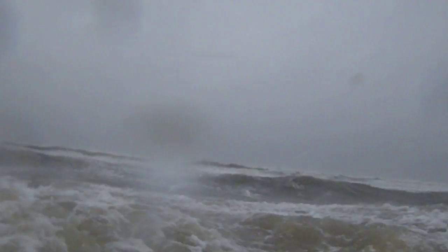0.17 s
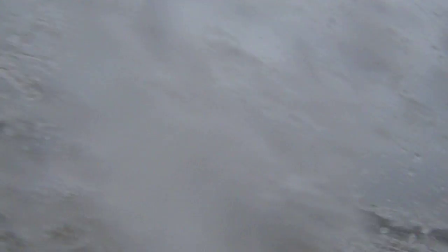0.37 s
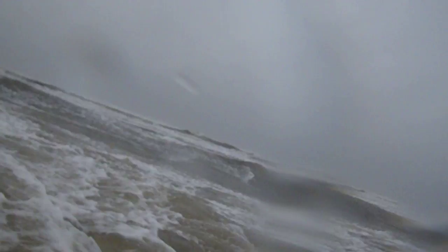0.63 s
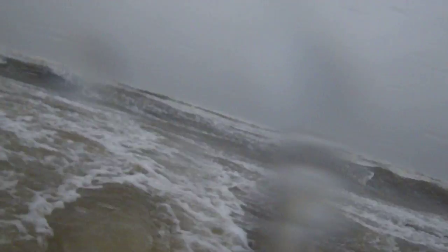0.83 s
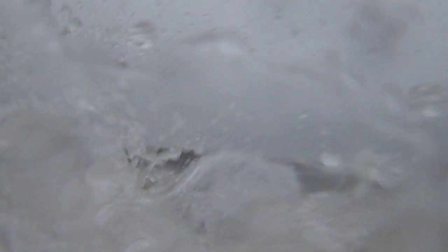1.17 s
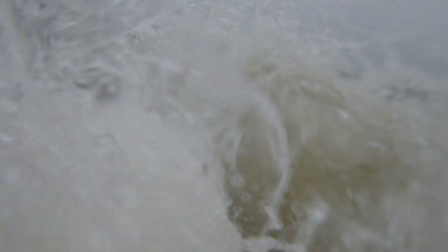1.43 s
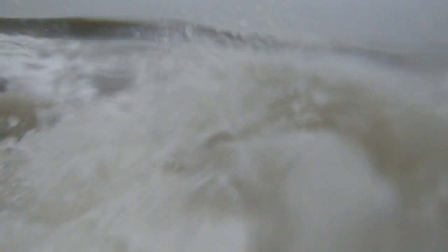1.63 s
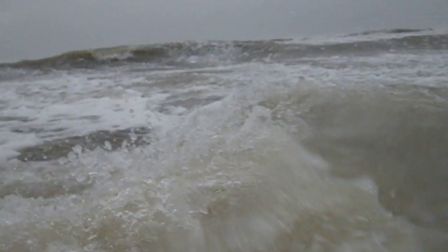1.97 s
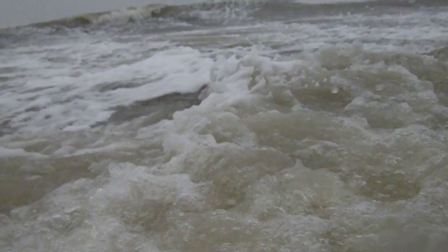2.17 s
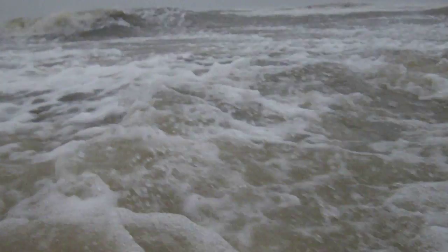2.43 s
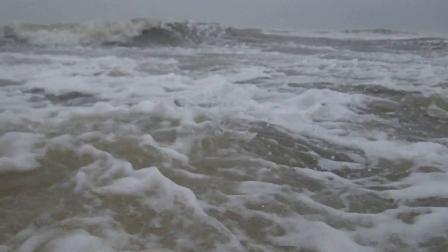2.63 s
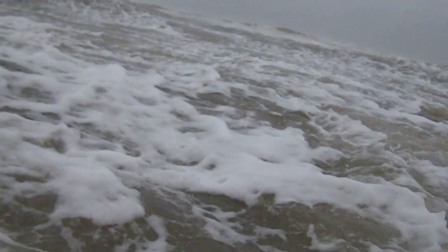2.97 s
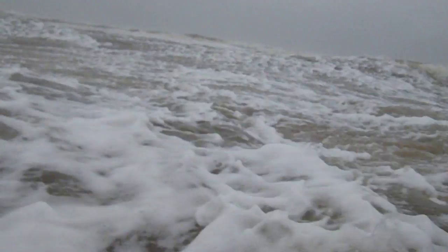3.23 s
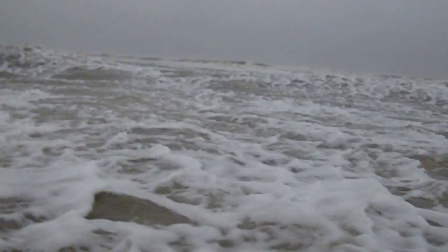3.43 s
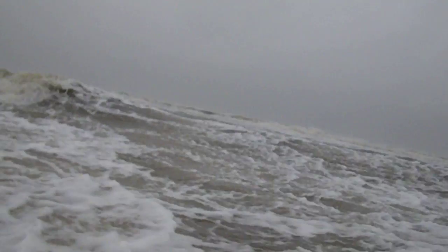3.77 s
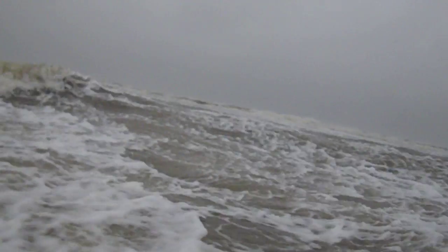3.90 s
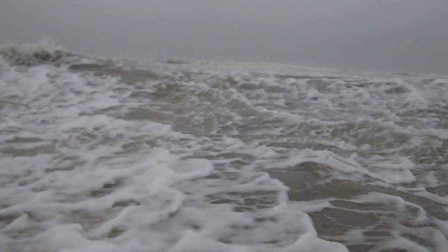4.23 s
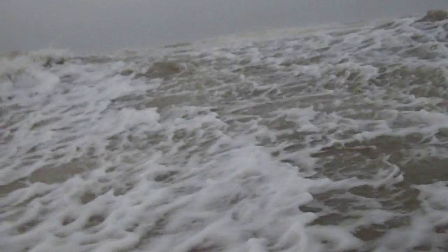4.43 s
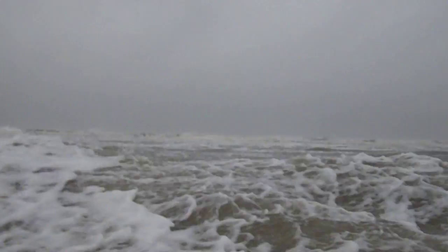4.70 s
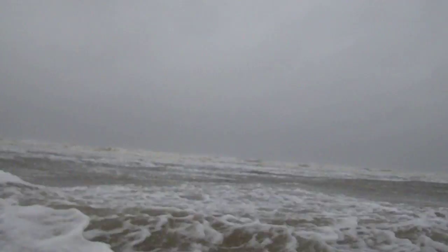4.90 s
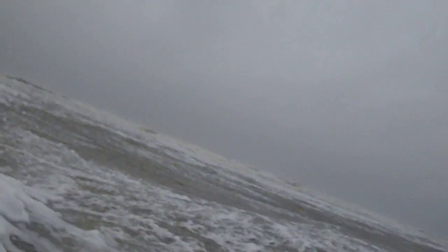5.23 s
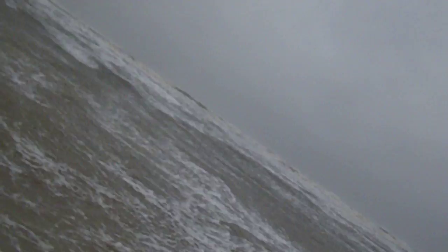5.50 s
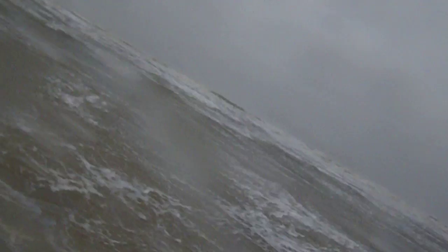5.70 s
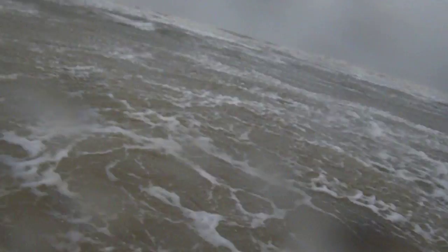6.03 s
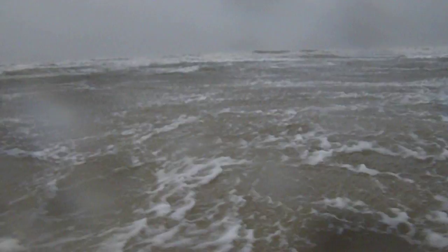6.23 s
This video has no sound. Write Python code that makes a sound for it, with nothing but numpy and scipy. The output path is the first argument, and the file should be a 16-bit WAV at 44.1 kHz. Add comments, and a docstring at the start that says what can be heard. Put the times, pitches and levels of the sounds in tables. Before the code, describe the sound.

Muffled, lumpy wind roar over churning breakers, with bursts of hard drops spattering the microphone cover and brief abrupt dips in the background.

```python
"""Gale-force wind buffets a small sealed camera on an open beach: eddies make lumpy low-pressure noise.
Surf and spray are shaped noise under the same turbulence; a brief whistle is noise in a narrow moving band.
Drops striking the microphone cover are heavily damped ticks and thumps, the big ones with a noise splat.
Now and then, mostly just after a heavy drop, the background drops abruptly and recovers in about 0.1 s.
A narrow-band microphone channel limits, rounds and clips the sum."""
import sys
import numpy as np
from scipy import signal
from scipy.fft import rfft, irfft
from scipy.io import wavfile
from scipy.ndimage import uniform_filter1d, minimum_filter1d

SR = 44100
rng = np.random.default_rng(int(sys.argv[2]) if len(sys.argv) > 2 else 0)


def materialize(psi):
    """Save the field psi as 16-bit PCM at rate SR to the path in sys.argv[1].

    A 1-D psi becomes a single channel; in a 2-D psi each row is a channel.
    """
    bounded = np.clip(np.atleast_2d(psi).T, -1, 1)
    quanta = np.round(bounded * 32767).astype(np.int16)
    wavfile.write(sys.argv[1], SR, quanta)


N = 280917
TIME = np.arange(N) / SR
RING_TIME = np.arange(900) / SR  # time axis of one drop's sound

# All levels are relative: each source adds its own trim, and each spectrum is scaled to an rms of one.
# strength of the wind on the microphone: (time [s], level [dB])
WIND_STRENGTH = [(0, -25.0), (0.3, -25), (0.7, -28.5), (1.3, -28.0), (2.0, -26.5), (2.55, -22.5),
                 (3.8, -24), (4.85, -23), (5.1, -25.5), (5.75, -23), (6.37, -26.0)]
# gusts that stand out of the gale: (time of peak [s], length [s], boost [dB])
GUST_ARCHES = [(.5, .07, 3), (1.33, .08, 3.5), (1.51, 0.13, 5), (1.7, 0.035, 5), (1.92, 0.079, 5),
               (2.22, .05, 2.5), (2.41, .07, 2.5), (3.17, .12, 3), (3.48, 0.058, 3.5), (3.6, 0.076, 3.5),
               (3.82, .07, 3), (4.075, .04, 6), (4.45, .06, 1.5), (4.56, .08, 3.5), (4.88, 0.025, 5.5)]
# spectrum of the wind pressure: (frequency [Hz], density [dB per Hz])
WIND_SPECTRUM = [(20, -46), (50, -22.5), (100, -10.5), (170, -1.5), (270, 1.5), (400, -2.5), (600, -12),
                 (1200, -41.5), (3000, -57)]
# roar of the breakers as they swell and ebb: (time [s], level [dB])
SURF_STRENGTH = [(0, -21.5), (0.1, -22.5), (0.5, -25.5), (0.62, -29.5), (0.82, -22.5), (1.05, -29),
                 (2.2, -26.5), (2.45, -24.0), (2.92, -23), (3.38, -30.5), (3.65, -22.5), (4.15, -30),
                 (4.35, -30), (4.95, -20.5), (5.3, -33.5), (5.52, -26), (5.76, -21.5), (6.0, -33),
                 (6.28, -21), (6.37, -23.5)]
# spectrum of the roar: (frequency [Hz], density [dB per Hz])
SURF_SPECTRUM = [(100, -35), (300, -15.5), (480, 0.5), (700, 0), (850, -6), (1150, -7), (1500, -17),
                 (3000, -48.5)]
# hiss of foam and flying spray: (time [s], level [dB])
FOAM_STRENGTH = [(0, -33.5), (0.1, -28.5), (0.28, -29), (0.6, -30.5), (0.82, -24), (1.05, -31.5),
                 (1.25, -29), (1.6, -32.5), (2.05, -30.0), (2.5, -34.5), (3.0, -33.0), (3.4, -35),
                 (3.9, -35), (4.35, -35), (4.62, -39), (5.0, -31.5), (5.5, -32), (5.8, -26.5), (6.25, -33),
                 (6.37, -37)]
# sheets of spray thrown at the housing: (time of peak [s], length [s], boost [dB])
SPRAY_SHEETS = [(.82, 0.12, 4.5), (1.23, .11, 4), (1.49, 0.066, 6), (2.05, .07, 4), (2.86, .06, 3.5),
                (3.89, .1, 7.5), (4.28, .05, 5.5), (5.5, .06, 9.5), (5.56, 0.029, 9), (5.79, 0.082, 6.5),
                (6.05, 0.15, 13)]
# spectrum of the foam hiss: (frequency [Hz], density [dB per Hz])
FOAM_SPECTRUM = [(300, -24), (900, 2.5), (1400, 3.5), (1900, 7), (2450, 7), (2900, -2.5), (3600, -6),
                 (4200, -20)]
# spectrum of droplets bursting close by, brighter than the foam: (frequency [Hz], density [dB per Hz])
DROPLET_SPECTRUM = [(300, -25), (900, -2.5), (1300, 0.5), (1900, -2), (2450, 7), (2900, -4), (3600, -0.5),
                    (4200, -16.5)]
# rushing tone as the gust catches an edge of the housing: (time [s], frequency [Hz], level [dB])
WHISTLE_TRACK = [(0, 1520, -43), (.07, 1560, -23.5), (.15, 1606, -31.5), (.21, 1602, -22.5),
                 (.28, 1520, -28), (.34, 1620, -66)]
# big drops on the microphone cover:
# (time [s], force [dB], tick pitch [Hz], thump level relative to the tick [dB], thump pitch [Hz])
BIG_DROPS = [(0.2418, -9, 1430, 7, 350), (.3082, -2, 2140, 1, 575), (0.3141, -1.5, 2040, -5, 567),
             (.333, -7.5, 2050, 9.5, 400), (.3571, -4.5, 1740, 6, 513), (0.4118, -8.5, 2340, -4, 280),
             (0.4897, -13, 1590, 12, 493), (.509, -4.5, 2200, 6, 630), (0.5679, -10, 1770, 6, 500),
             (.6389, -2.5, 1770, 1, 866), (0.7265, -9, 2000, -17, 510), (0.7477, 1.5, 1750, -0.5, 513),
             (.781, -4, 1790, 5, 1120), (0.8048, 1.5, 2120, 2, 580), (0.8179, 2, 2100, 2, 490),
             (0.8352, 5, 1490, 3.5, 463), (0.8802, 2, 1640, 7, 497), (0.911, 1, 1920, 0, 600),
             (0.9162, 5, 2150, 7, 370), (1.022, -8.5, 2690, 6.5, 403), (1.0622, -9.5, 2520, 6, 337),
             (1.1023, 4, 1955, -2.5, 405), (1.2695, -8.5, 2970, -22, 617), (1.3715, -7.5, 2570, -9, 800),
             (1.5504, -5, 1740, 11.5, 416), (1.624, -9.5, 2340, 7.5, 298), (1.6331, -10.5, 2420, -8, 404),
             (1.705, -7.5, 2306, 6, 354), (1.7541, -7.5, 1910, -0.5, 695), (1.7635, -1.5, 1930, 1.5, 725),
             (1.878, -5.5, 2070, -1.5, 920), (1.9783, -8.5, 2430, -20, 590), (2.1528, -10, 1980, 6, 380),
             (2.2345, -11, 1860, 5, 440), (2.434, -7.5, 2020, -1, 740), (2.8474, -10, 1890, -17, 590),
             (3.3058, -1.5, 2000, -18, 675), (4.1861, -19, 1700, 16.5, 450),
             (4.3321, -12.5, 3050, -15, 414), (4.384, -11.5, 1480, 9.5, 300), (4.42, -12.5, 2460, 8, 310),
             (5.0914, -5, 2260, -9.5, 920), (5.1634, -8, 2400, -13, 696), (5.1684, -1, 2220, -30, 746),
             (5.2031, -5, 2170, -6, 400), (5.2258, -0.5, 1330, 3, 950), (5.3592, -1, 1850, -2, 504),
             (5.4179, -2, 2380, -36, 820), (5.4569, 4, 2300, -10.5, 790), (5.5046, -1, 2430, -16, 500),
             (5.5237, -3.5, 1580, -24, 960), (5.5426, -2.5, 2410, -30, 460), (5.5623, -5, 1710, 3, 1150),
             (5.5741, 10.5, 2220, -8, 646), (5.672, -8.5, 2110, -8, 424), (5.6936, -9, 1900, 6.5, 694),
             (5.705, -4.5, 2140, -20, 710), (5.7158, 0, 1500, 6.5, 900), (5.7338, 1.5, 2200, 0, 300),
             (5.786, -3.5, 2020, -17, 600), (5.8015, -7, 1800, 8.5, 493), (5.8438, -7.5, 2020, -0.5, 695),
             (5.875, -12.5, 1780, 3, 406), (5.992, -0.5, 1950, 4, 434), (6.046, -4, 2140, -2, 714),
             (6.059, 0, 2030, -10, 610), (6.0724, 2.5, 1760, -16, 880), (6.0804, -1.5, 1940, 1.5, 670),
             (6.1996, -3.5, 2100, -34, 520), (6.243, -9.5, 1840, -16, 590), (6.2857, -8.5, 2020, -18, 610),
             (6.3437, -11, 1940, -10, 533)]
# spectrum of a big drop's burst: (frequency [Hz], density [dB per Hz])
SPLAT_SPECTRUM = [(150, -23.5), (400, 1.5), (1100, 13), (2000, -6), (3000, 8.5), (4200, -14)]
# abrupt dips of the background, mostly just after a heavy drop:
# (time of onset [s], time to recover [s], depth [dB])
LEVEL_DIPS = [(.364, 0.057, 6.5), (0.645, 0.11, 11), (.92, 0.089, 3.5), (1.108, 0.092, 10),
              (1.376, 0.034, 11.5), (1.556, 0.081, 4), (1.767, 0.12, 12.5), (3.217, 0.041, 11.5),
              (3.41, .05, 7.5), (5.578, 0.092, 3), (5.883, 0.12, 21.5), (6.092, 0.12, 14)]


def gain_of(db):
    """Decibels: the amplitude ratio is ten to the power of level over twenty."""
    return 10 ** (np.asarray(db) / 20)


def evened(x):
    """Normalization: the root mean square becomes one."""
    return x / np.sqrt(np.mean(x ** 2) + 1e-20)


def follow(rows):
    """Linear interpolation: the columns of a table become curves in time."""
    s, *columns = np.transpose(rows)
    return [np.interp(TIME, s, column) for column in columns]


def humps(rows):
    """Superposition of half-cosine arches: each row swells and falls away once; the sum is in dB."""
    total_db = np.zeros(N)
    for s, length, db in rows:
        phase = np.clip((TIME - s) / length, -.5, .5)
        total_db += db * np.cos(np.pi * phase)
    return total_db


def coloured(x, spectrum):
    """Spectral shaping: a table of gains over log frequency weights x, at an rms of one."""
    hz, db = np.transpose(spectrum)
    bins_hz = np.fft.rfftfreq(N, 1 / SR)
    gain = gain_of(np.interp(np.log(bins_hz + 1), np.log(hz), db))
    return evened(irfft(rfft(x) * gain, N))


def flutter(slow_hz, fast_hz):
    """Band-limited random modulation: noise kept between two rates, at an rms of one."""
    hz = np.fft.rfftfreq(N, 1 / SR)
    slow_cut = hz ** 2 / (hz ** 2 + slow_hz ** 2)
    band = slow_cut / (1 + (hz / fast_hz) ** 4)
    return evened(irfft(rfft(rng.standard_normal(N)) * band, N))


def steadied(x, size=4000):
    """Division by short-term rms: slow drift in strength goes, quick flutter stays; size in samples."""
    power = uniform_filter1d(uniform_filter1d(x ** 2, size), size // 2)
    return x / np.sqrt(abs(power) + 1e-12)


def low_pass(x, hz, size):
    """Linear-phase filtering: a symmetric kernel of size samples removes treble without delay."""
    return signal.oaconvolve(x, signal.firwin(size, hz, window="blackman", fs=SR), "same")


def high_pass(x, hz):
    """Second-order filtering: bass falls gently below the corner frequency."""
    return signal.sosfilt(signal.butter(2, hz, "highpass", fs=SR, output="sos"), x)


def tilted(x, pivot_hz, tilt_db):
    """Spectral tilt: what lies above the pivot rises as what lies below it falls."""
    low = low_pass(x, pivot_hz, size=201)
    high = x - low
    return low * gain_of(-tilt_db) + high * gain_of(tilt_db)


def wind(level_db, eddies, eddy_db=2.5):
    """Turbulent pressure: eddies rolling over the microphone modulate low-frequency noise."""
    pressure = rng.standard_normal(N) * gain_of(eddy_db * eddies)
    return gain_of(level_db + 1.5) * steadied(coloured(pressure, WIND_SPECTRUM), size=3000)


def surf(level_db, eddies, eddy_db=3.5):
    """Broadband radiation of white water: noise of fixed colour, torn by the same eddies."""
    roar = rng.standard_normal(N) * gain_of(eddy_db * eddies)
    return gain_of(level_db - 0.76) * steadied(coloured(roar, SURF_SPECTRUM))


def spray(level_db, eddies, exposure, eddy_db=3.5, droplets_per_s=750, spread_db=3, patter_db=-1.5):
    """Random impulses over noise: foam hisses, and droplets patter the more the housing is exposed."""
    hiss = coloured(rng.standard_normal(N), FOAM_SPECTRUM)
    sizes = gain_of(spread_db * np.minimum(rng.exponential(1, N), 4))
    signs = rng.choice([-1, 1], N)
    landed = rng.random(N) < droplets_per_s / SR
    patter = coloured(sizes * signs * landed, DROPLET_SPECTRUM)
    water = hiss + gain_of(patter_db) * exposure * patter
    return gain_of(level_db + 0.98) * steadied(water * gain_of(eddy_db * eddies))


def whistle(width_hz=175):
    """Narrow-band turbulence: two random envelopes in quadrature spread a carrier of moving pitch."""
    hz, level_db = follow(WHISTLE_TRACK)
    angle = 2 * np.pi * np.cumsum(hz) / SR
    tone = flutter(0.74, width_hz) * np.cos(angle) + flutter(1, width_hz) * np.sin(angle)
    return gain_of(level_db) * evened(tone)


def pulse(rise):
    """Critically damped envelope: it peaks at one after rise seconds, then dies away."""
    age = RING_TIME / rise
    return age * np.exp(1 - age)


def ring(hz, rise):
    """Heavily damped oscillation: a sine under an envelope that peaks after rise seconds."""
    return pulse(rise) * np.sin(2 * np.pi * hz * RING_TIME)


def small_drops(level_db, exposure, per_s=42, above_db=9, spread_db=3.5, rise=0.00052,
                thump_hz=420, thump_rise=0.00062, thump_db=3, count=12):
    """Random impacts: scattered drops tick at a pitch set by size; larger, lower ones thump more."""
    out = np.zeros(N)
    tick_pitches = np.geomspace(1300, 3200, count)
    bulks = np.linspace(1, 0, count)  # from largest to smallest
    for tick_hz, bulk in zip(tick_pitches, bulks):
        forces = gain_of(spread_db * np.minimum(rng.exponential(1, N), 3))
        landed = rng.random(N) < per_s / count / SR
        thump = gain_of(thump_db) * ring(thump_hz * (2 - bulk), thump_rise)
        drop = ring(tick_hz, rise) + bulk * thump
        out += signal.oaconvolve(forces * landed, drop)[:N]
    return gain_of(level_db + above_db) * exposure * out


def add(mix, s, sound):
    """Superposition: a sound joins the mix, in place, at time s."""
    part = mix[max(round(s * SR), 0):][:len(sound)]
    part += sound[:len(part)]


def drops(tick_rise=0.00043, thump_rise=0.00056, splat_rise=0.00068, splat_db=-8, leak_hz=200, growth=0.21):
    """Impact on a wet membrane: each drop ticks, pushes the cover in with a thump, and bursts in a splat."""
    blows, splats = np.zeros((2, N))
    for s, force_db, tick_hz, thump_db, thump_hz in BIG_DROPS:
        bulk = gain_of(growth * force_db)  # a heavier drop stays longer on the cover
        thump = gain_of(thump_db) * ring(thump_hz, thump_rise * bulk)
        blow = ring(tick_hz, tick_rise) + thump
        add(blows, s, gain_of(force_db) * blow)
        add(splats, s, gain_of(force_db + splat_db) * pulse(splat_rise * bulk))
    burst_noise = coloured(rng.standard_normal(N), SPLAT_SPECTRUM)
    # slow pressure leaks round the cover, so the thumps carry no deep bass
    return high_pass(blows, leak_hz) + splats * burst_noise


def dipping(onset_s=0.0073):
    """Gain modulation: the level drops abruptly, then recovers slowly at first and ever faster."""
    dip_db = np.zeros(N)
    for s, recovery_s, depth_db in LEVEL_DIPS:
        age = np.maximum(TIME - s, 0)
        onset = np.minimum(age / onset_s, 1)
        remaining = np.maximum(1 - (age / recovery_s) ** 2, 0)
        dip_db += depth_db * onset * remaining
    return gain_of(-dip_db)


def scene(least_churn=0.66, churn=0.48, sheltered_db=-12, drenched_span_db=12, unrest_db=1.0,
          surf_in_gust=0.66, roar_drift_db=1.6, hiss_drift_db=1.06):
    """Common modulation: one turbulence stirs wind, surf and spray; the background dips under the big drops."""
    gust_db = humps(GUST_ARCHES) + unrest_db * flutter(slow_hz=4, fast_hz=10)
    wind_db = follow(WIND_STRENGTH)[0] + gust_db
    surf_db = follow(SURF_STRENGTH)[0] + surf_in_gust * gust_db  # the roar takes a share of each gust
    foam_db = follow(FOAM_STRENGTH)[0]
    spray_db = foam_db + humps(SPRAY_SHEETS)
    # the more the spray outweighs the roar, the more water is hitting the camera (0.1 to 1)
    exposure = np.clip((spray_db - surf_db - sheltered_db) / drenched_span_db, .1, 1)
    # turbulence is roughest in flying water
    eddies = flutter(slow_hz=2.6, fast_hz=70.0) * (least_churn + churn * exposure)
    gale = wind(wind_db, eddies)
    # roar and hiss drift in colour
    roar_tilt_db = roar_drift_db * flutter(slow_hz=3, fast_hz=22)
    roar = tilted(surf(surf_db, eddies), pivot_hz=764, tilt_db=roar_tilt_db)
    hiss_tilt_db = hiss_drift_db * flutter(slow_hz=5, fast_hz=60)
    hiss = tilted(spray(spray_db, eddies, exposure), pivot_hz=2700, tilt_db=hiss_tilt_db)
    background = gale + roar + hiss + whistle() + small_drops(foam_db, exposure)
    return (dipping() * background + drops())[None]


def limiter(x, threshold_db=-2, recovery_db_per_s=190, attack=0.00049, size=880):
    """Peak limiting: a peak pulls the gain down within milliseconds; it holds for 20 ms, then recovers."""
    over_db = np.maximum(20 * np.log10(abs(x) + 1e-9) - threshold_db, 0)
    held_db = -minimum_filter1d(-over_db, size, origin=size // 2 - 1)  # largest of the last 20 ms
    recovery = recovery_db_per_s * TIME
    duck_db = np.maximum.accumulate(held_db + recovery) - recovery
    lag = np.exp(-1 / (attack * SR))  # attack is a time constant [s]
    smooth_duck_db = signal.lfilter([1 - lag], [1, -lag], duck_db)
    return x * gain_of(-smooth_duck_db)


def record(dry, headroom=0.77, bass_cut_hz=55, voice_band_hz=4300, edge_hz=16300):
    """Saturation in a narrow band: drops overload the channel until the limiter acts; highest peaks clip."""
    limited = limiter(dry[0])
    rounded = limited / (1 + (limited / headroom) ** 4) ** .25
    narrow = low_pass(high_pass(rounded, bass_cut_hz), voice_band_hz, size=301)
    clipped = np.clip(narrow, -.71, .71)
    return low_pass(clipped, edge_hz, size=301)[None]


dry = scene()
out = record(dry)
materialize(out)
```